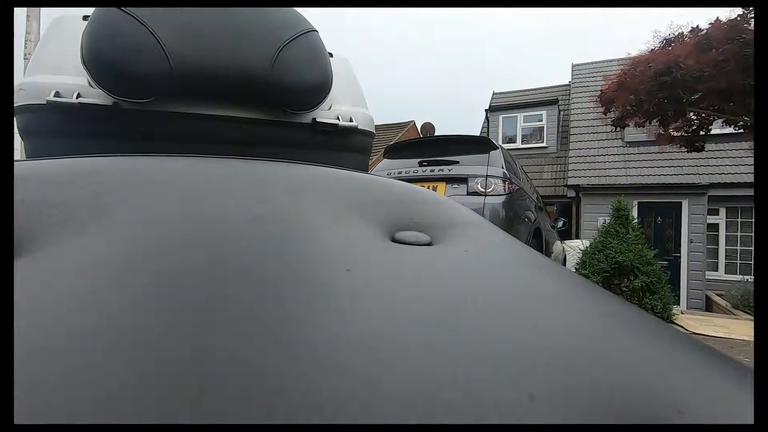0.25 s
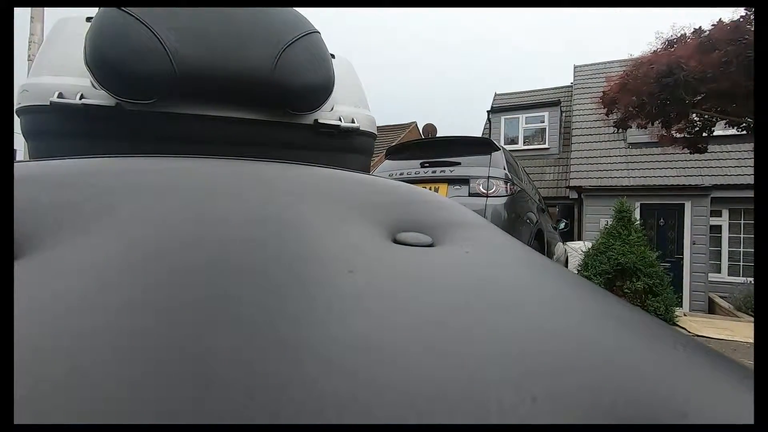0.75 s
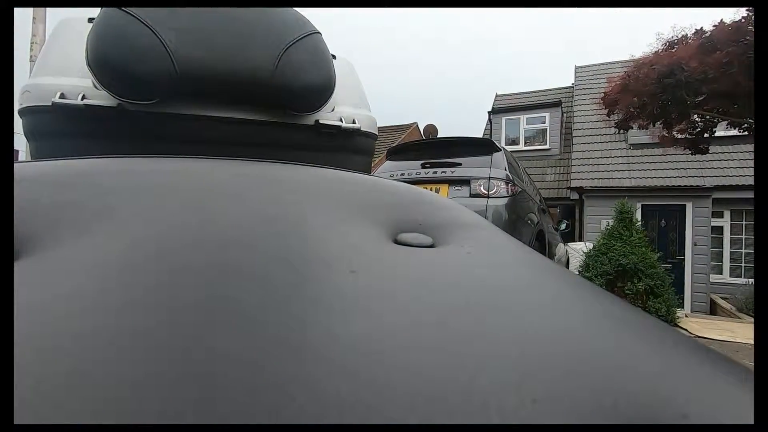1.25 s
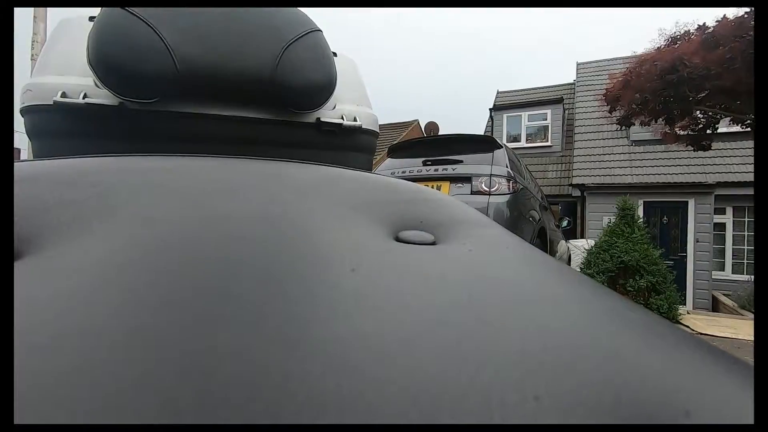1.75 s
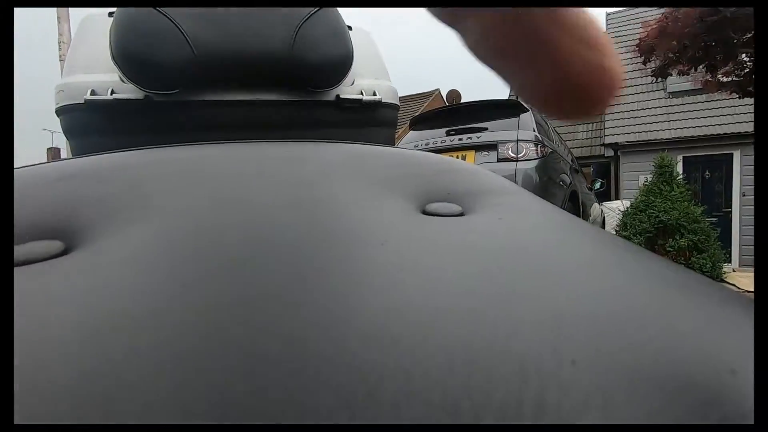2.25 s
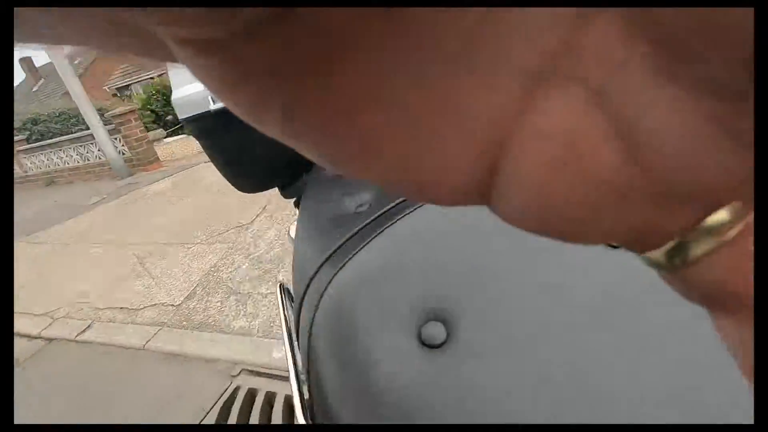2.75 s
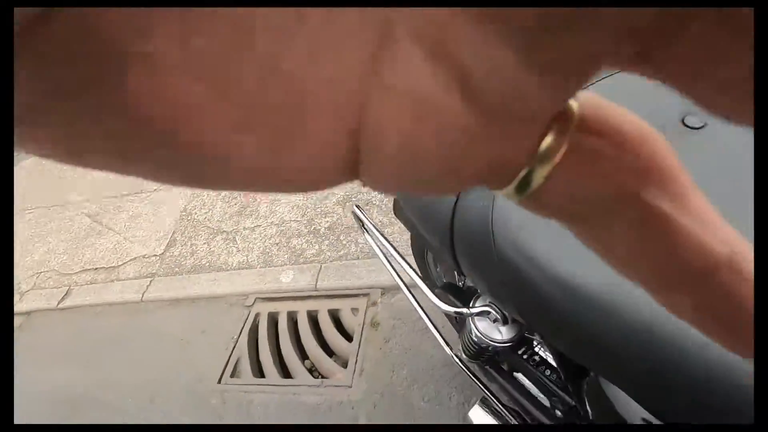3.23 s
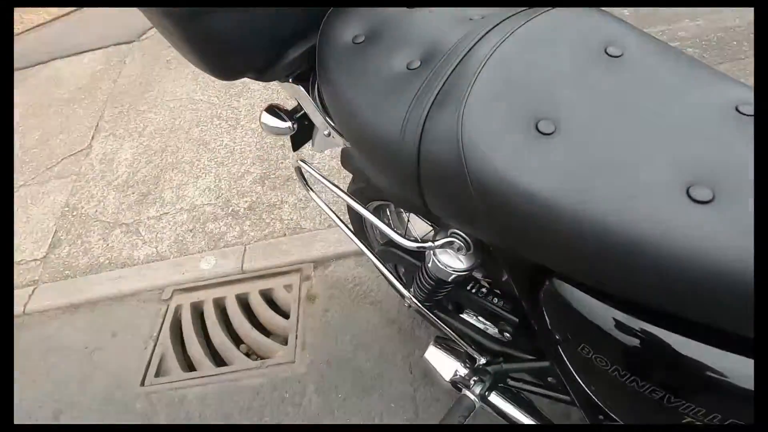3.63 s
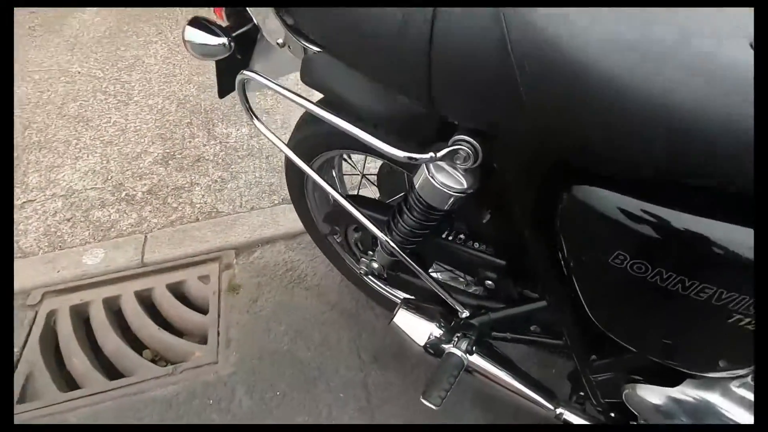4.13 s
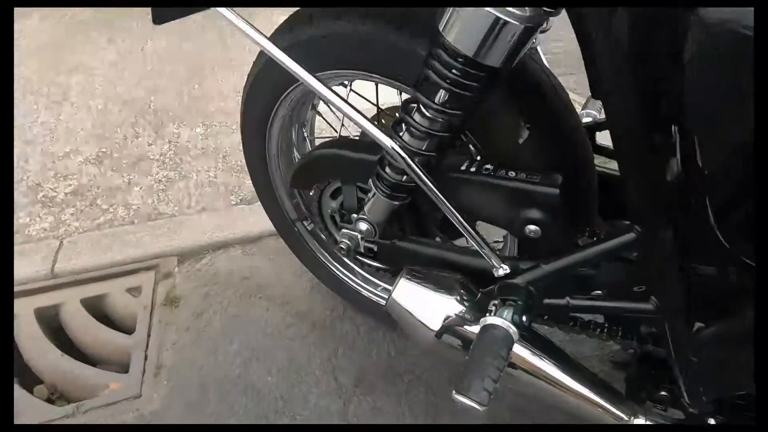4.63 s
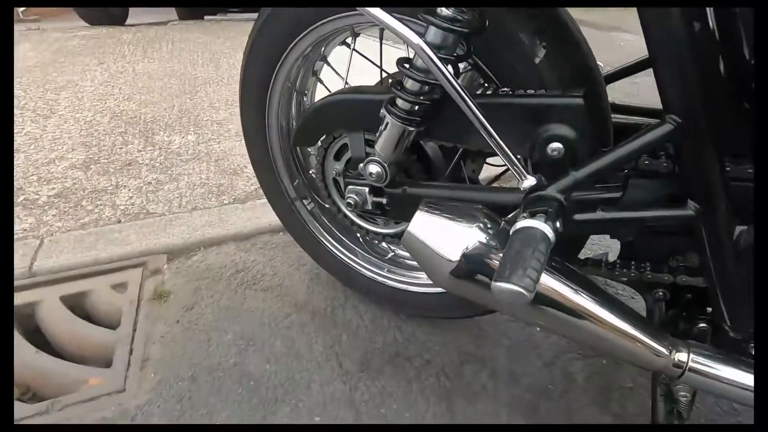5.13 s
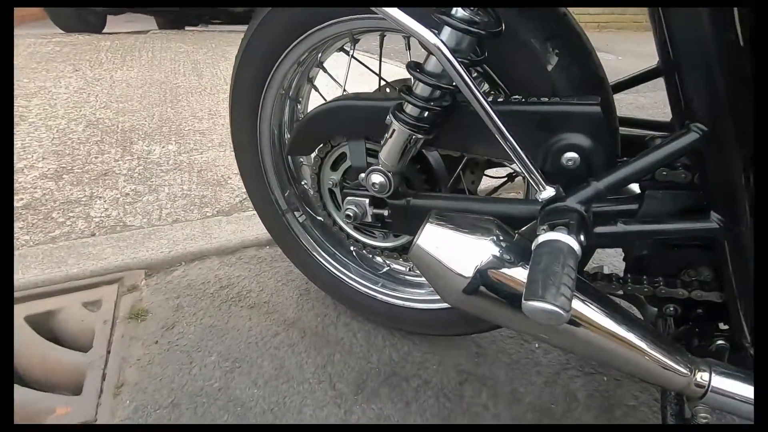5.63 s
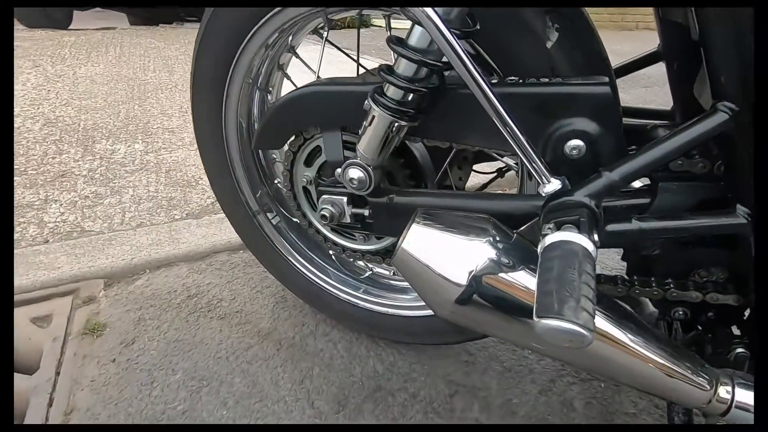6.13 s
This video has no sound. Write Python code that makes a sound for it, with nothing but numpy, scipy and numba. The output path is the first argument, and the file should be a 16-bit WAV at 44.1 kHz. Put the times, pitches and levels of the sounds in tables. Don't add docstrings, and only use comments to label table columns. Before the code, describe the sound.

A motorcycle starter grinds briefly in a driveway, the engine thumps into life, and its lumpy low idle grows crisper as the listener nears the exhaust.

```python
import sys
import numpy as np
from scipy import signal
from scipy.fft import rfft, irfft
from scipy.io import wavfile
from scipy.ndimage import uniform_filter1d
from numba import njit

SR = 44100
rng = np.random.default_rng(int(sys.argv[2]) if len(sys.argv) > 2 else 0)


def store_pcm(level_fs):
    pcm = np.round(np.clip(level_fs, -1, 1) * 32767).astype(np.int16)
    wavfile.write(sys.argv[1], SR, np.atleast_2d(pcm).T)


def rack_gain(trim_db):
    fader = np.asarray(trim_db, float)
    return 10 ** (fader / 20)


N = 280917
T = np.arange(N) / SR

# time in seconds, four-stroke cycles per second.
SPEED = [(1.5584, 9.029), (1.95, 10.169), (2.3, 11.033), (2.9, 9.995), (3.35, 10.028), (3.8, 9.422),
         (4.3, 10.012), (4.65, 10.079), (5.0, 9.399), (5.85, 9.176), (6.05, 8.623), (6.37, 9.198)]
# time in seconds, strength in dB.
CATCH = [
    (1.024, 1.5),
    (1.052, 1),
    (1.153, -0.5),
    (1.196, -3),
    (1.328, 1),
    (1.379, 2),
    (1.4481, 1.5),
    (1.497, -7),
]
# centre in Hz, width in Hz, signed gain.
PIPE = [(55.37, 10.36, 1.2333), (114.9, 42.8, .76), (153.7, 38.5, -1.5247), (160, 15.25, 2.5),
        (240.8, 98, 0.8242), (256.5, 64.5, -0.5626), (366.5, 44, -0.28)]
# frequency in Hz, density in dB per Hz.
RUSTLE_COLOUR = [(240, -30), (400, -7.5), (605, -2.5), (834, -16), (1030, -3), (1130, -8), (1360, -6.5),
                 (1740, -9), (1930, -11.5), (2190, -17), (2470, -15.5), (2670, -15.5), (5310, -28.5),
                 (9400, -29), (10400, -40), (15500, -53)]
# centre in Hz, width in Hz, level in dB (not used).
CASING = [(1020, 720, 0), (1986, 244, -4), (2390, 50, -7)]
# share of the cycle, tick level in dB.
VALVES = [(0, 6), (.3, 2.5), (.38, 3.5), (.56, -3), (.71, 6.5), (.86, -12.5)]
# time in seconds, level in dB, fade in seconds.
TEETH = [(0.813, -19, 0.049), (0.853, -25.5, 0.066), (0.883, -29.5, 0.089), (.93, -32, .03),
         (0.966, -38, 0.043), (1.0, -22, 0.042), (1.035, -25.5, 0.078), (1.075, -37, 0.027),
         (1.156, -22.5, 0.033), (1.199, -26, 0.013), (1.232, -32.5, 0.032), (1.257, -21.5, 0.04),
         (1.328, -34.5, 0.019), (1.362, -32.5, 0.022)]
# frequency in Hz, density in dB per Hz.
STARTER_COLOUR = [(180, -18), (300, -13), (500, -37), (731, -10.5), (794, -16), (985, -5), (1420, -3.5),
                  (1590, -2), (1700, -4.5), (4070, -19), (6050, -24), (9450, -29), (15500, -57.5)]
# centre in Hz, width in Hz, level in dB (not used).
STARTER_BODY = [(777, 18, -11), (1010, 150, -4), (1570, 14, 0), (1880, 43, -6), (2150, 37, -11),
                (2944, 140, -15), (5930, 530, -20), (6540, 80, -23), (6220, 250, -27), (7510, 57, -30),
                (8000, 50, -29), (8900, 140, -28)]
# start in seconds, end in seconds, from Hz, to Hz, level in dB.
SQUEALS = [(.815, .84, 1097, 1143, -28), (.855, .875, 2150, 2300, -27), (.865, .885, 744, 720, -28.5),
           (.885, .922, 1010, 1020, -24), (.89, .92, 1954, 1850, -30.5), (.885, .915, 2880, 3050, -37),
           (.88, .92, 5750, 5860, -43.5), (.95, .98, 1120, 1200, -31), (1.0, 1.015, 1550, 1500, -27.5),
           (1.0, 1.03, 5530, 6000, -49), (1.04, 1.07, 1850, 1880, -41), (1.065, 1.09, 9130, 8100, -43.5),
           (1.07, 1.09, 2970, 2700, -38.5), (1.08, 1.095, 1150, 1200, -28.5),
           (1.16, 1.185, 1657, 1550, -25.5), (1.165, 1.182, 3230, 3310, -42), (1.2, 1.22, 1805, 1630, -32),
           (1.258, 1.3, 1895, 1746, -34.5), (1.28, 1.305, 5850, 5750, -50), (.83, .86, 326, 343, -28),
           (1.04, 1.1, 607, 603, -36), (.925, .945, 1770, 1850, -29), (.93, .945, 2570, 2630, -36)]
# start and end in seconds, from Hz, to Hz, level in dB.
HOWL = [(1.035, 1.082, 1570, 1570, -23)]
# start in seconds, pitch in Hz, level in dB, 60 dB decay in seconds.
SHUDDER = [(0.718, 74.5, -18, 0.17), (0.819, 82.3, -12.5, 0.33), (0.857, 73.2, -16, 0.66),
           (.93, 68.2, -12, 0.27), (0.976, 69.3, -25, 0.38)]
# start in seconds, end in seconds, from Hz, to Hz, level in dB.
PUMP = [
    (.617, .81, 5240, 5240, -68),
    (.02, .81, 10550, 10550, -88),
    (.02, .81, 15650, 15650, -96),
    (.49, .56, 7200, 7200, -82),
]
# time in seconds, peak in dB, centre in Hz, 60 dB decay in seconds.
TICKS = [(.002, -47, 4950, 0.038), (.805, -44, 5000, .08), (.028, -40.5, 8000, 0.062),
         (.03, -29.5, 3130, 0.069), (.05, -39, 2520, 0.049), (.066, -36, 7030, 0.046),
         (.28, -44, 5010, 0.048), (1.575, -37.5, 3880, .04), (2.598, -45.5, 9260, 0.02),
         (2.6, -43.5, 3300, 0.019), (2.652, -52.5, 4040, .03), (3.924, -41.5, 4940, 0.036),
         (3.985, -37, 6000, 0.12), (3.99, -31, 1700, 0.13), (3.385, -46, 8000, .06),
         (5.489, -51, 7070, 0.049)]
# time in seconds, peak in dB, centre in Hz, 60 dB decay in seconds.
KNOCKS = [(.644, -21.5, 760, 0.057), (3.561, -21, 1070, 0.023), (3.998, -30, 1400, 0.028),
          (4.469, -31, 910, 0.011), (4.888, -19.5, 450, 0.055), (4.889, -19.5, 1040, 0.042),
          (6.174, -23, 1110, 0.02)]
# start in seconds, end in seconds, from Hz, to Hz, level in dB.
BIRDS = [(.732, .747, 2920, 2370, -45), (1.415, 1.44, 2500, 2480, -52), (1.49, 1.58, 4550, 4700, -69),
         (1.62, 1.8, 4480, 4060, -65), (1.82, 2.16, 3070, 3020, -58), (2.33, 2.42, 4400, 4000, -67),
         (2.5, 2.545, 3450, 3220, -57), (2.56, 2.615, 3140, 2830, -41.5), (2.68, 2.85, 3050, 2960, -57)]
# frequency in Hz, density in dB per Hz.
STREET = [(15, -43.5), (25, -18), (64, -1.5), (144, -5.5), (227, -8), (305, -5), (349, -11.5), (1240, -22),
          (1490, -27.5), (1620, -28.5), (3440, -36.5), (10100, -68), (15500, -77)]
# time in seconds, level in dB.
STREET_LEVEL = [(0, -25.5), (.55, -25.5), (.8, -24.5), (1.3, -30), (1.5, -34.5)]
# time in seconds, place (0 seat, 1 silencer), engine rustle in dB.
CAMERA = [(1.4, 0.3, 2.5), (1.7, 0.18, 1), (2.1, 0, -1), (2.5, 0, 1), (3.5, 0.17, 4), (3.8, 0.76, 0.5),
          (4.2, 0.77, 1), (4.8, .85, 1.5), (5.3, 0.71, 3), (6.37, 0.76, -0.5)]
# time in seconds, level in dB.
CUP = [(2.7, -68), (3, -47.5), (3.9, -57.5), (4.2, -75)]
# time in seconds, side level in dB.
WIDTH = [(3.45, -59), (3.6, -21.5), (4, -8.5), (4.4, -26.5), (5, -61), (6.15, -49), (6.25, -24)]

SHARP_HZ, EDGE_HZ, BOOM_DB, FIRING_DB = (118, 291, 218), (230, 455, 180), (6.5, 6, 3), (-1.5, -2, -0.5)
SEAT_DB, SILENCER_DB = (-59, -48.5, -52.5, -62.5), (-39.5, -41.5, -45, -56.5)
CRANK_LEAD, IDLE_PER_S = .01, 10
CATCH_S = 1.31
SECOND_SHARE = .376
SHARP_PER_SPEED, SECOND_DB, SECOND_DB_PER_SPEED = .07, -.5, -0.5
SOFT, SOFT_PER_SPEED = 0.31, 0.44
CHARGE_DB, PUFF_DB = .4, 41.6
RING_S, CHOKE_S, CHOKE_DB = .086, 0.0074, -7
GROUND_S, GROUND_GAIN = .01, .35
BODY_SWING_DB = 6
HISS_DB, BUZZ_DB, WIND_DB = -94, -65, -40.5


def curve(table):
    s, *columns = np.transpose(table)
    return [np.interp(T, s, c) for c in columns]


def unit(x):
    return x / np.sqrt(np.mean(x ** 2))


@njit
def svf(x, hz, k):
    y, b, l = np.empty((3, len(x))), 0., 0.
    for i in range(len(x)):
        g = np.tan(np.pi * hz[i] / SR)
        v = (b + g * (x[i] - l)) / (1 + g * (g + k))
        y[0, i], y[1, i] = l + g * v, k * v
        y[2, i] = x[i] - y[0, i] - y[1, i]
        b, l = 2 * v - b, l + 2 * g * v
    return y


def band(x, hz, width):
    return signal.lfilter(*signal.iirpeak(hz, hz / width, SR), x)


def coloured(x, points):
    hz, db = np.transpose(points)
    f = np.arange(N // 2 + 1) * SR / N + 1
    gain = rack_gain(np.interp(np.log(f), np.log(hz), db, left=-90, right=-90))
    return unit(irfft(rfft(x) * gain, N))


def walk(rate):
    k = int(SR / rate)
    steps = np.repeat(rng.standard_normal(N // k + 1), k)
    return unit(uniform_filter1d(uniform_filter1d(steps, k), k)[:N])


def impulses(s, size):
    return np.bincount(np.minimum((s * SR).astype(int), N), size, N + 1)[:N]


def fade(x, s):
    return signal.lfilter([1], [1, -np.exp(-1 / (s * SR))], x)


def burst(s, fade_s):
    return fade(impulses(np.array([s]), [1]), fade_s)


def firings():
    start = SPEED[0][0]
    angle = CRANK_LEAD + np.cumsum(curve(SPEED)[0] * (T >= start)) / SR
    return np.r_[start, np.interp(np.arange(1, int(angle[-1]) + 1), angle, T), N / SR]


def heard(values):
    place = np.clip(curve(CAMERA)[0], 0, 1)
    return np.where(T < CATCH_S, values[0], values[1] + place * (values[2] - values[1]))


def gas_puffs():
    fast = curve(SPEED)[0] - IDLE_PER_S
    s = firings()
    scatter = rng.standard_normal((len(s) - 1, 3))
    db = CHARGE_DB * scatter[:, 2]
    second_s = s[:-1] + np.diff(s) * (SECOND_SHARE + .003 * scatter[:, 0])
    second = impulses(second_s, rack_gain(db + 2 * CHARGE_DB * scatter[:, 1]))
    second = second * rack_gain(SECOND_DB + SECOND_DB_PER_SPEED * fast)
    soft = np.clip(SOFT - SOFT_PER_SPEED * fast, 0, 1)
    puffs = impulses(s[:-1], rack_gain(db)) + (1 - soft) * second + 1.15 * uniform_filter1d(soft * second, size=115)
    catch_s, catch_db = np.transpose(CATCH)
    puffs = puffs + impulses(catch_s, rack_gain(catch_db))
    return np.roll(puffs, -int(.0013 * SR)) * rack_gain(PUFF_DB + heard(FIRING_DB))


def exhaust():
    fast = curve(SPEED)[0] - IDLE_PER_S
    sharp_hz = heard(SHARP_HZ) * (1 + SHARP_PER_SPEED * fast * (T > SPEED[0][0]))
    edge_hz = heard(EDGE_HZ)
    puffs = gas_puffs()
    for hz, k in ((1.0 * sharp_hz, 1.67), (0.94 * sharp_hz, .9), (1.036 * edge_hz, .55), (0.82 * edge_hz, 1.2)):
        puffs = svf(puffs, hz, k)[0]
    heat = 1 + .012 * walk(9)
    modes = [gain * svf(puffs, hz * heat, width / hz)[1] for hz, width, gain in PIPE]
    pipe = modes[0] * rack_gain(heard(BOOM_DB)) + sum(modes[1:])
    pipe = pipe - 2 * band(pipe, 400, 300)
    pipe = pipe + 0.17 * np.roll(band(pipe, 320, 150), int(0.01886 * SR))
    s = firings()
    since = T - s[np.clip(np.searchsorted(s, T + .004) - 1, 0, None)]
    choke = rack_gain(CHOKE_DB * np.clip((since - RING_S) / CHOKE_S, 0, 1))
    pipe = pipe * uniform_filter1d(choke, size=200)
    return pipe + GROUND_GAIN * np.roll(pipe, int(GROUND_S * SR))


def valve_ticks(s):
    share, db = np.transpose(VALVES)
    chance = rng.standard_normal((len(s) - 1, len(share), 2))
    when = s[:-1, None] + np.diff(s)[:, None] * np.abs(share + 0.025 + 0.0059 * chance[..., 0])
    taps = impulses(when.ravel(), rack_gain(db + 1.4 * np.tanh(chance[..., 1])).ravel())
    return uniform_filter1d(fade(taps, 0.0096), size=220)


def rustle():
    s = np.r_[CATCH[6][0], firings()]
    turn = np.interp(T, s, np.arange(len(s))) % 1
    swell = np.cos(2 * np.pi * (turn - .33))
    ticks = valve_ticks(s)
    cup_db = curve(CUP)[0]
    grit = coloured(rng.standard_normal(N) * rack_gain(1.9 * rng.exponential(size=N)), RUSTLE_COLOUR)
    grit = grit + 1.05 * sum(band(grit, hz, w) * rack_gain(4.7 * np.tanh(walk(30))) for hz, w, _ in CASING)
    grit = grit - np.clip(0.45 + rack_gain(cup_db + 40), 0, .95) * band(grit, 2100, 300)
    ranges = ((320, 850), (850, 2200), (2200, 4500), (4500, 14000))
    filters = [signal.butter(3, edge, "band", fs=SR, output="sos") for edge in ranges]
    gas, casing, fins, gear = (unit(signal.sosfilt(f, grit)) for f in filters)
    engine_db = curve(CAMERA)[1]
    gas_db, casing_db, fins_db, gear_db = (
        engine_db + heard((seat, seat, near)) for seat, near in zip(SEAT_DB, SILENCER_DB))
    casing = casing * (1 + rack_gain(cup_db + 37)) + unit(band(casing, 1550, 140)) * rack_gain(cup_db - casing_db)
    fins = fins * rack_gain(fins_db + 0.3 * swell + 0.66 * walk(25)) * (1.02 + 0.39 * ticks)
    gas = gas * rack_gain(gas_db + 6.2 * swell + 0.83 * walk(22)) * (0.66 + 0.17 * ticks) / (1 + rack_gain(cup_db + 50))
    casing = casing * rack_gain(casing_db + 1.3 * swell + 0.34 * walk(25)) * (0.96 + 0.51 * ticks)
    gear = gear * rack_gain(gear_db + 1.5 * swell + 1.2 * walk(25)) * (0.68 + 0.69 * ticks) / (1 + rack_gain(cup_db + 45))
    return (gas + casing + fins + gear) * np.clip((T - 1.3) / 0.091, 0, 1)


def starter():
    load = sum(rack_gain(db) * burst(s, fade_s) for s, db, fade_s in TEETH)
    teeth = rng.standard_normal(N) * rack_gain(0.87 * rng.exponential(size=N) + 1.4 * walk(150))
    grind = coloured(teeth, STARTER_COLOUR)
    body = sum(band(grind, hz, w) * rack_gain(BODY_SWING_DB * np.tanh(walk(40))) for hz, w, _ in STARTER_BODY)
    grind = unit(grind + 0.76 * body)
    bright = signal.sosfilt(signal.butter(2, 3500, "high", fs=SR, output="sos"), grind)
    grind = grind + bright * (1.2 * (load / load.max()) ** .4 - 1)
    grind = grind * uniform_filter1d(load, size=220, origin=60)
    shudder = sum(rack_gain(db) * np.sin(2 * np.pi * hz * (T - s)) * burst(s, t60 / np.log(1000))
                  for s, hz, db, t60 in SHUDDER)
    song = whistles(SQUEALS, wobble_hz=24) + whistles(HOWL, wobble_hz=6)
    return grind + song + uniform_filter1d(shudder, size=60)


def whistles(table, wobble_hz, more_hz_per_s=0):
    out, wobble, flutter = np.zeros(N), walk(120), rack_gain(2.8 * np.tanh(walk(60.1)))
    for t0, t1, hz0, hz1, db in table:
        i = slice(int(t0 * SR), int(t1 * SR))
        n = len(T[i])
        hz = np.linspace(hz0, hz1, n) + (wobble_hz + more_hz_per_s * (t1 - t0)) * wobble[i]
        tone = np.sin(2 * np.pi * np.cumsum(hz) / SR)
        out[i] += rack_gain(db + 8) * signal.windows.tukey(n, min(.5, 900 / n)) * tone * flutter[i]
    return out


def clicks(table, spread):
    noise, out = rng.standard_normal(N), np.zeros(N)
    for s, db, hz, t60 in table:
        ring = unit(band(band(noise, hz, hz * spread), hz, hz * spread))
        out += rack_gain(db - 4) * ring * burst(s, max(t60, .005) / np.log(1000))
    return out


def knocks():
    out = np.zeros(N)
    for s, db, hz, t60 in KNOCKS:
        blow = band(band(impulses(np.array([s]), [1]), hz, 8.5 / t60), hz, 0.98 * hz)
        out += rack_gain(db + 12.5) * SR / (3 * hz) * blow
    return out


def street():
    noise = coloured(rng.standard_normal(N), STREET)
    low = signal.sosfilt(signal.butter(2, 250, fs=SR, output="sos"), noise)
    return (low * rack_gain(2.0 * walk(21)) + (noise - low) * rack_gain(1.0 * walk(6.8))) * rack_gain(curve(STREET_LEVEL)[0])


def scene():
    birds = whistles(BIRDS, wobble_hz=6.6, more_hz_per_s=170)
    upper = rustle() + clicks(TICKS, spread=0.45) + knocks() + birds
    mid = exhaust() + starter() + street() + whistles(PUMP, wobble_hz=3) + upper
    side = (np.roll(upper, 900) - np.roll(upper, 1700)) * rack_gain(curve(WIDTH)[0])
    return np.array([mid + side, mid - side])


def band_limit(x):
    return signal.sosfilt(signal.butter(12, 15700, fs=SR, output="sos"), x)


def record(dry):
    cut = np.full(N, 50.3)
    x = np.array([svf(svf(c, cut, .714)[2], cut, .714)[2] for c in dry])
    x = x + rack_gain(WIND_DB) * unit(band(band(rng.standard_normal(N), 28, 12), 28, 12))
    grip = 1 + rack_gain(curve(CUP)[0] + 56)
    buzz = rack_gain(HISS_DB) + rack_gain(BUZZ_DB) * uniform_filter1d(x[0] ** 2, size=100) * grip
    hiss = rng.standard_normal((2, N))
    hiss = buzz * (hiss + 2.5 * band(hiss, 12000, 1500))
    uneven = np.roll(x, 300, axis=1) * np.array([[-.4], [.8]])
    top = signal.butter(4, 11000, "high", fs=SR, output="sos")
    x = x + signal.sosfilt(top, hiss + uneven)
    return band_limit(np.tanh(0.56 * x) / 0.65)


dry = scene()
out = record(dry)
store_pcm(out)
```